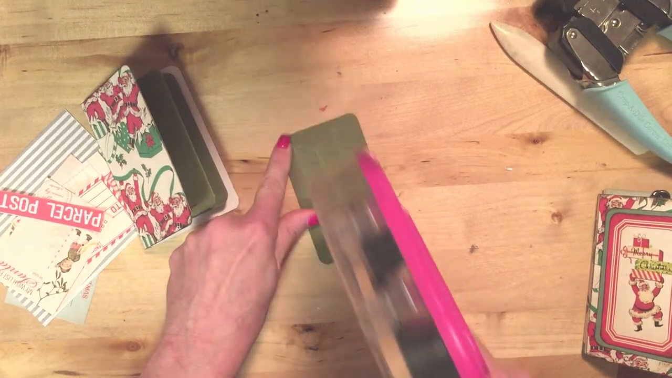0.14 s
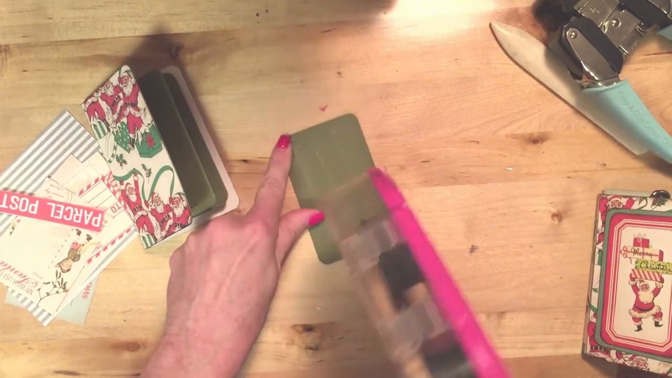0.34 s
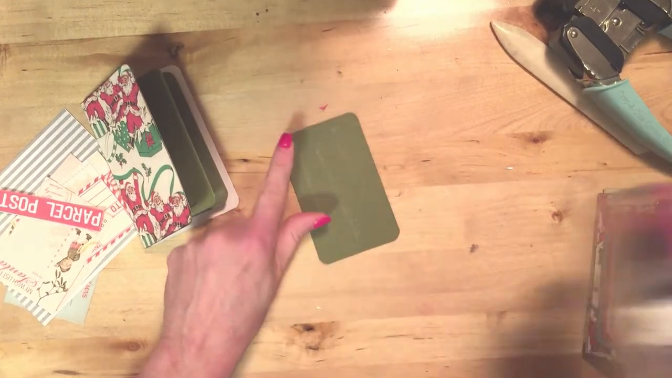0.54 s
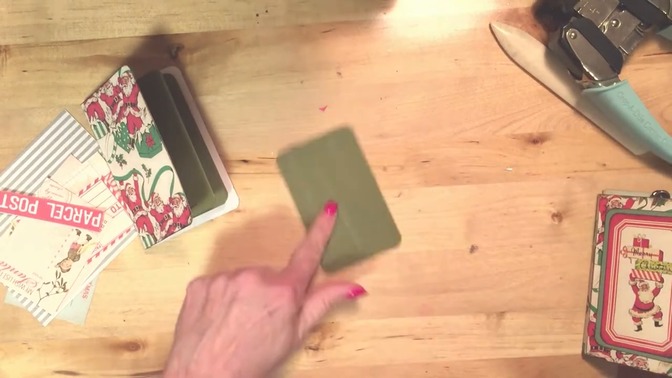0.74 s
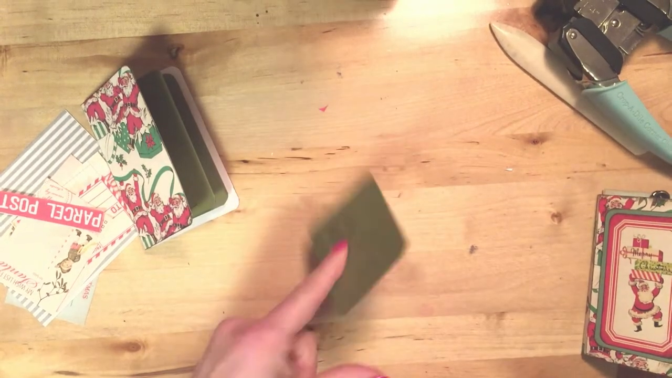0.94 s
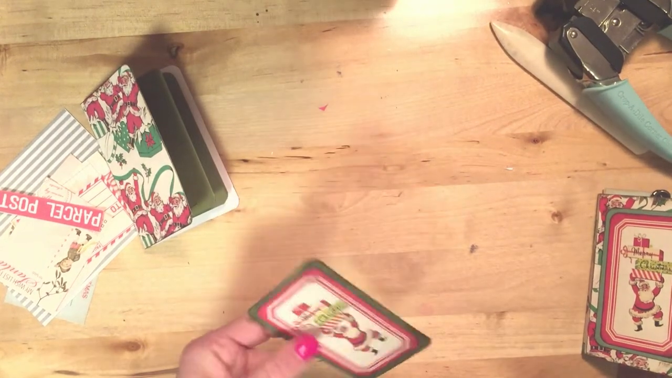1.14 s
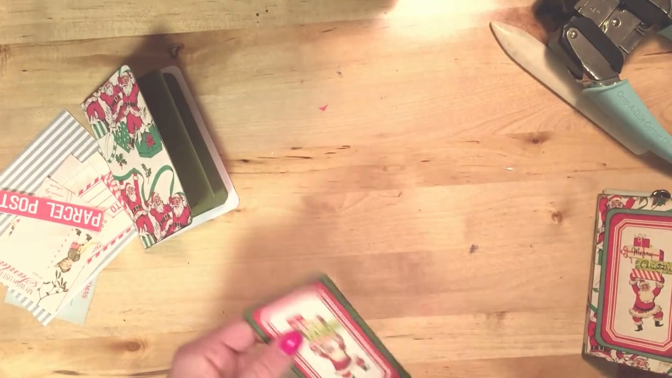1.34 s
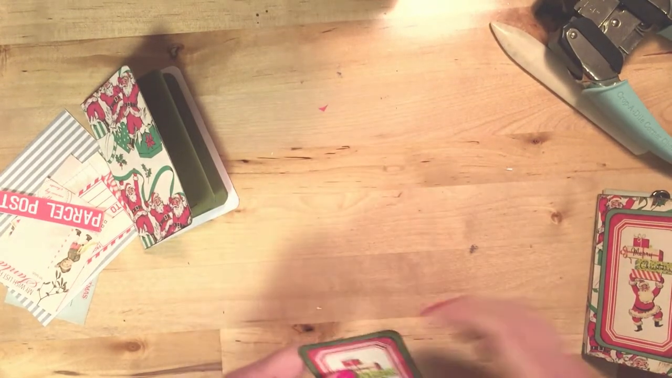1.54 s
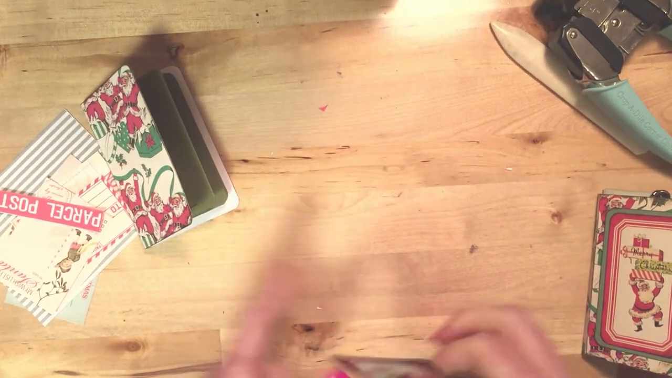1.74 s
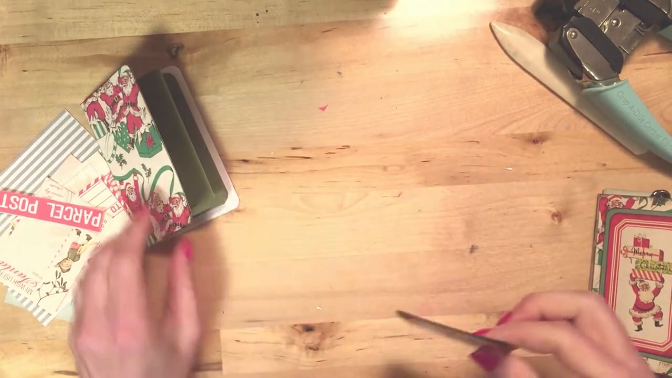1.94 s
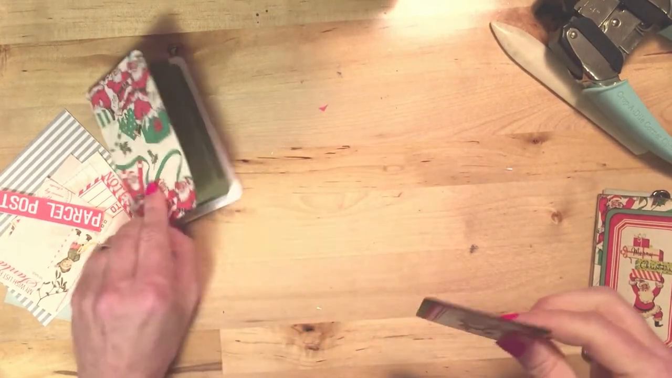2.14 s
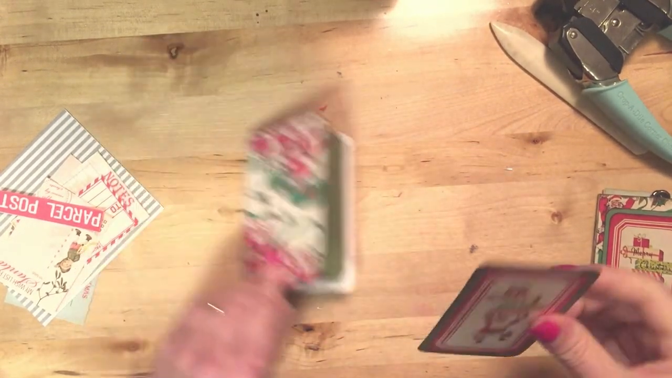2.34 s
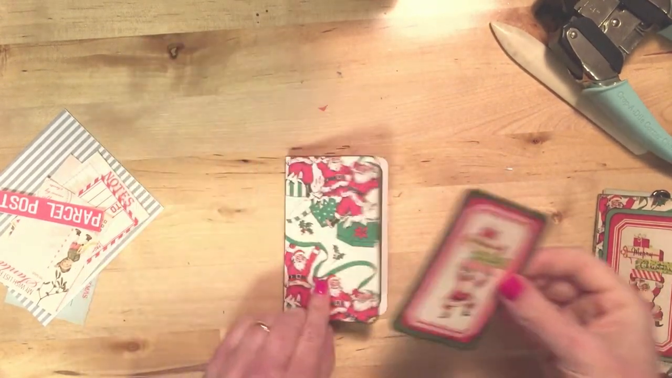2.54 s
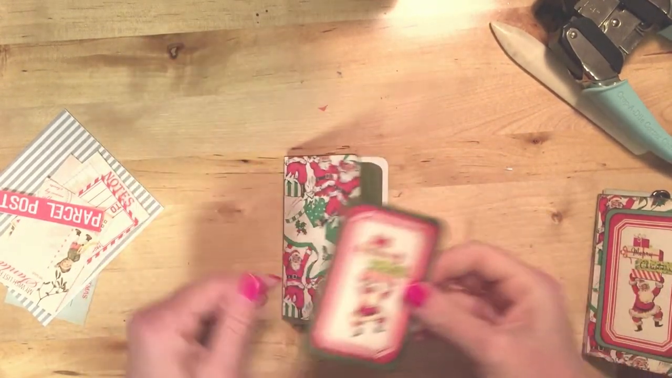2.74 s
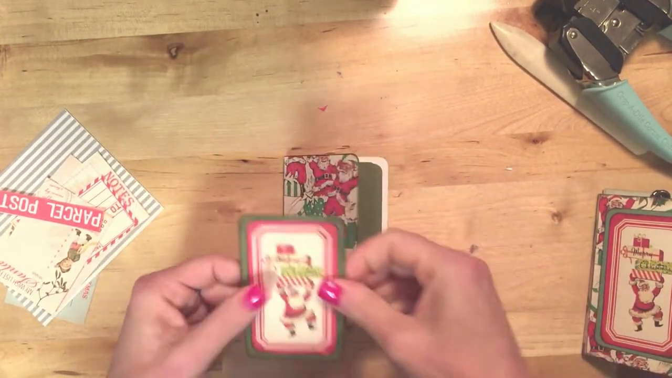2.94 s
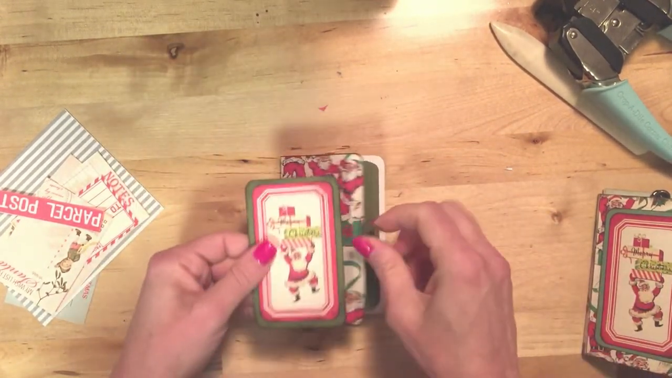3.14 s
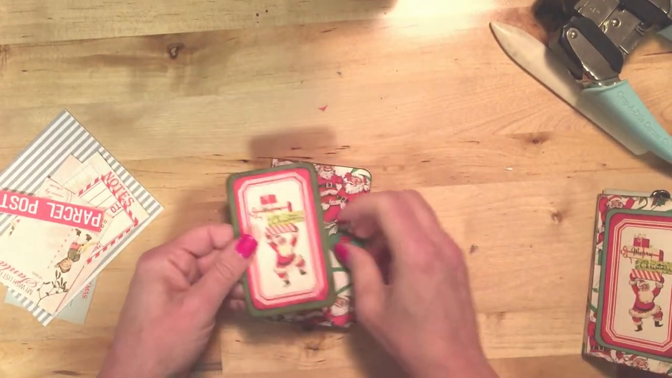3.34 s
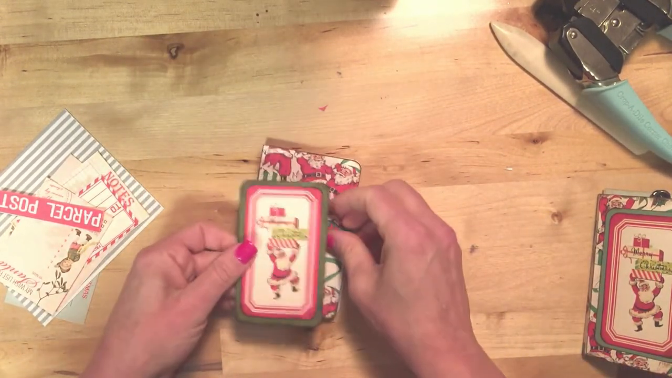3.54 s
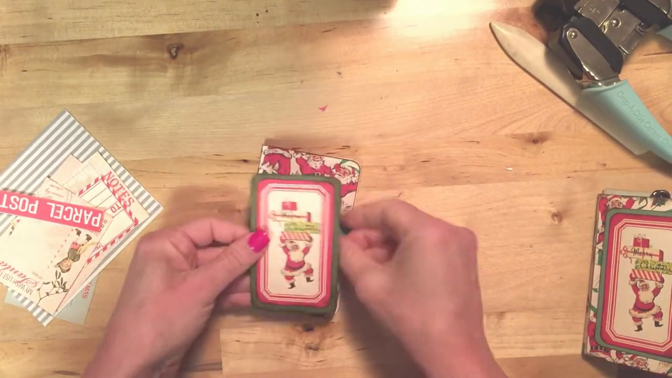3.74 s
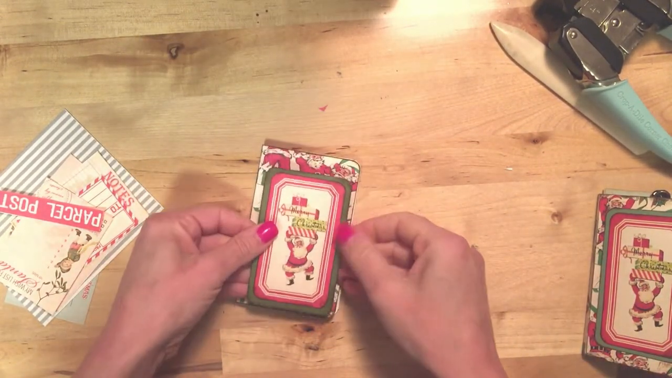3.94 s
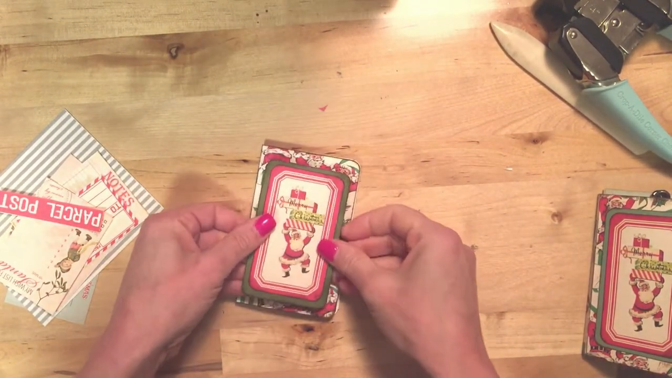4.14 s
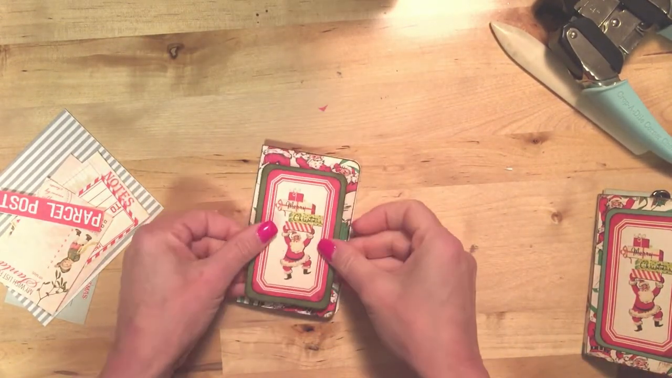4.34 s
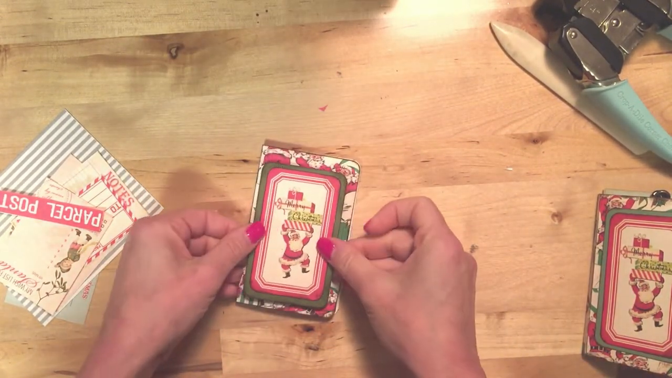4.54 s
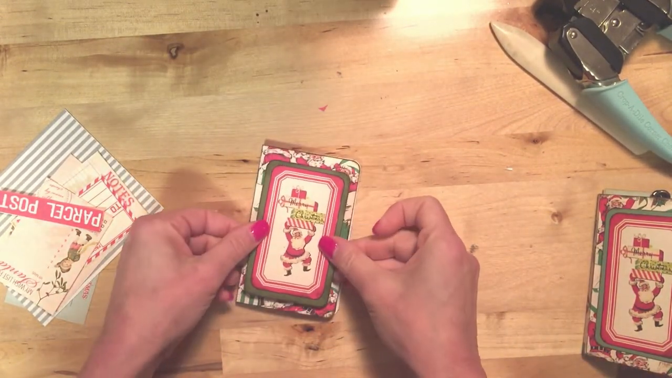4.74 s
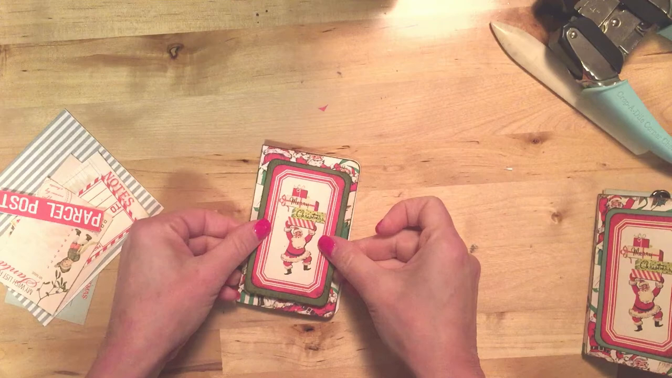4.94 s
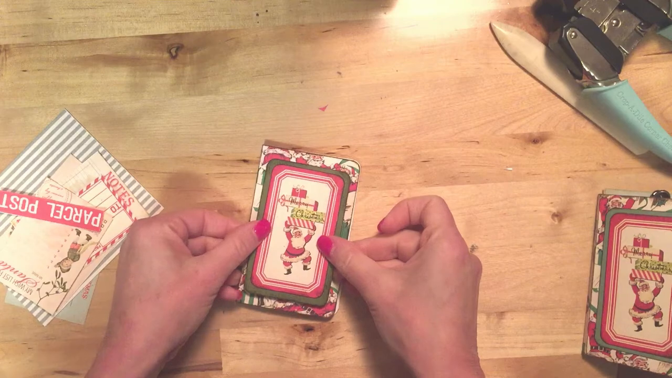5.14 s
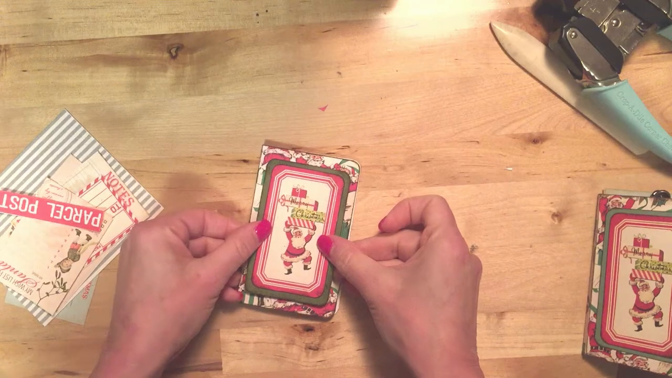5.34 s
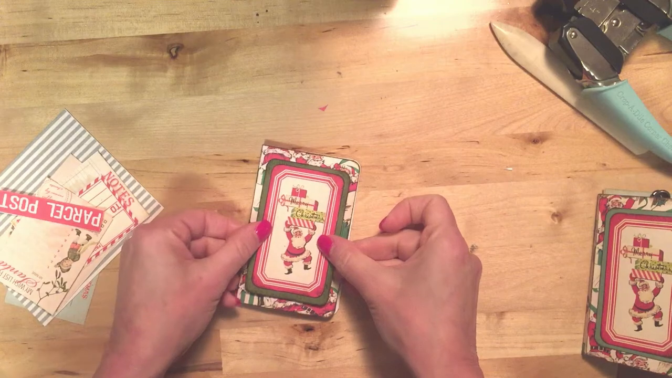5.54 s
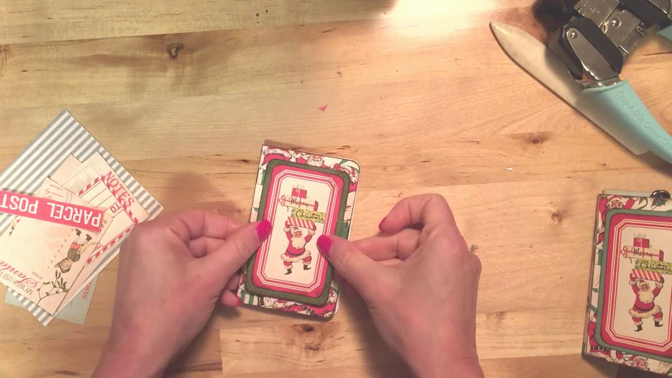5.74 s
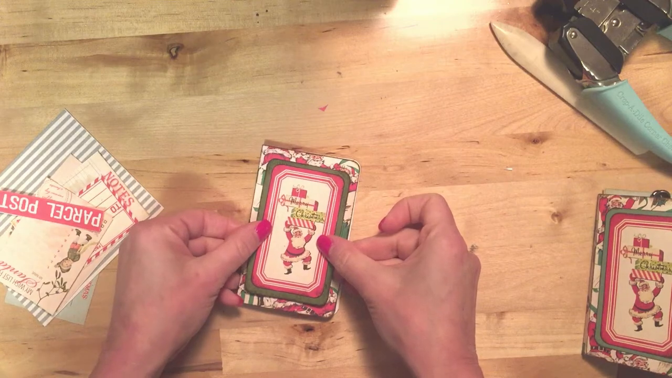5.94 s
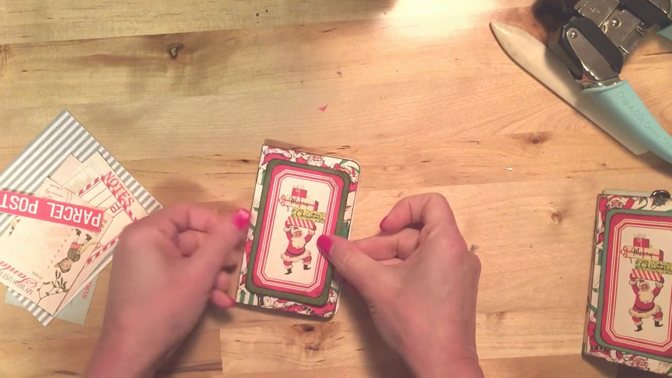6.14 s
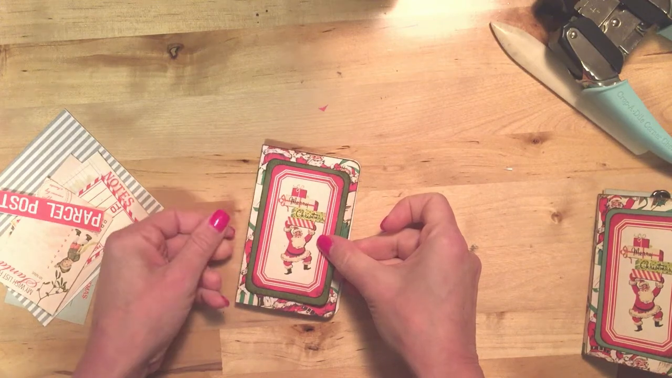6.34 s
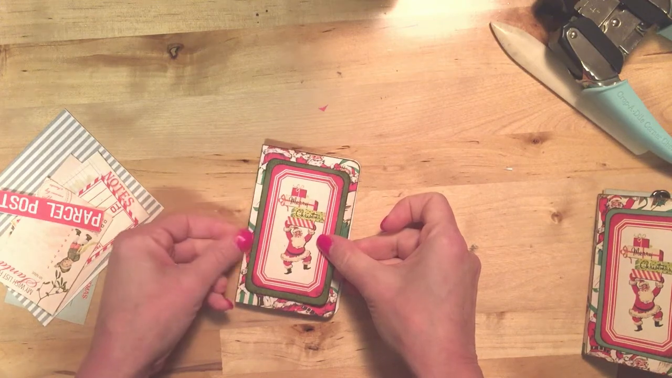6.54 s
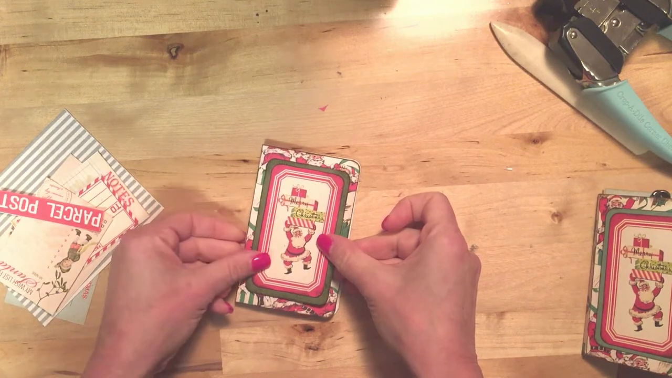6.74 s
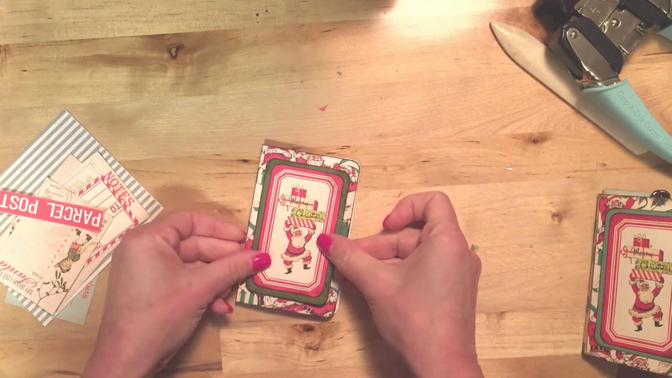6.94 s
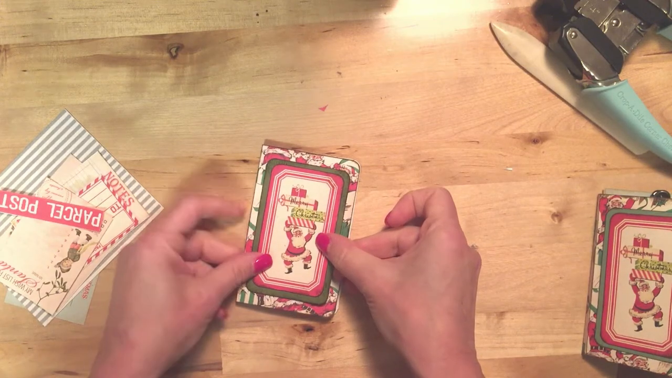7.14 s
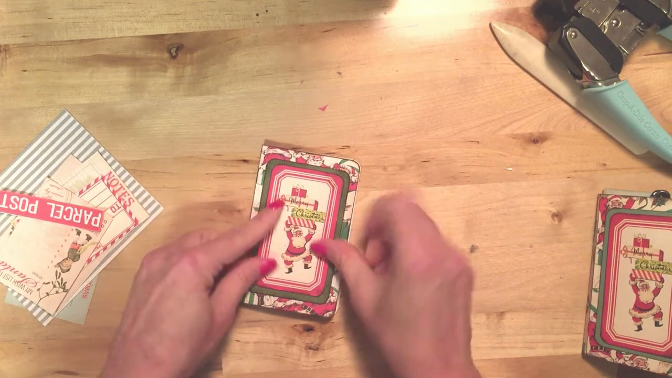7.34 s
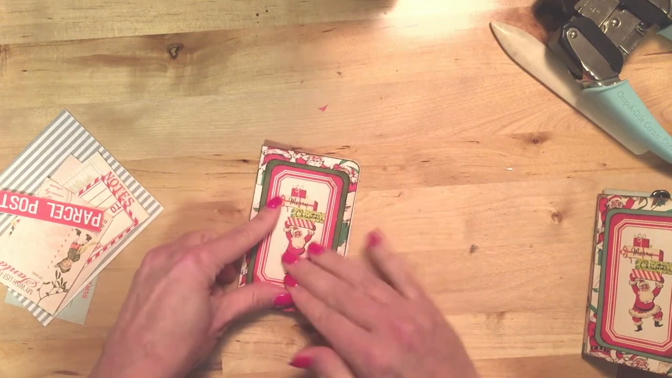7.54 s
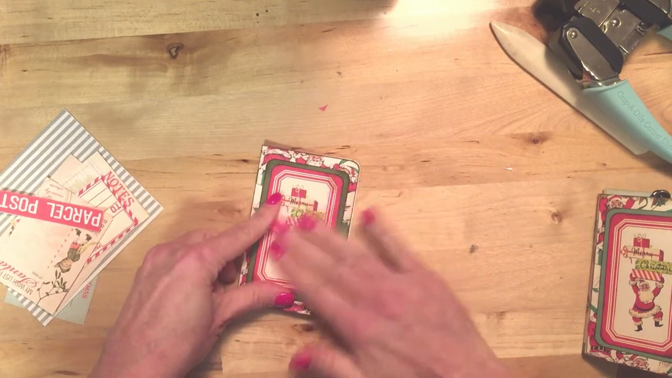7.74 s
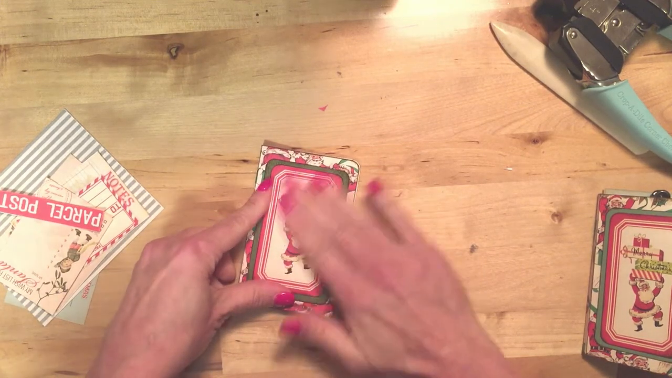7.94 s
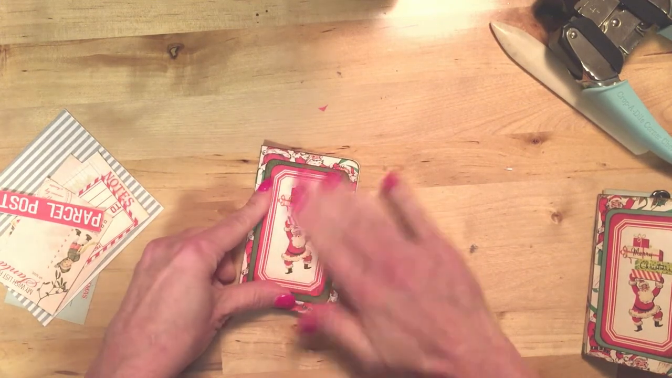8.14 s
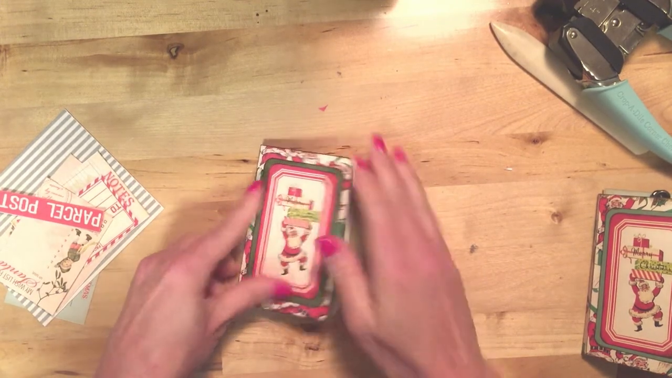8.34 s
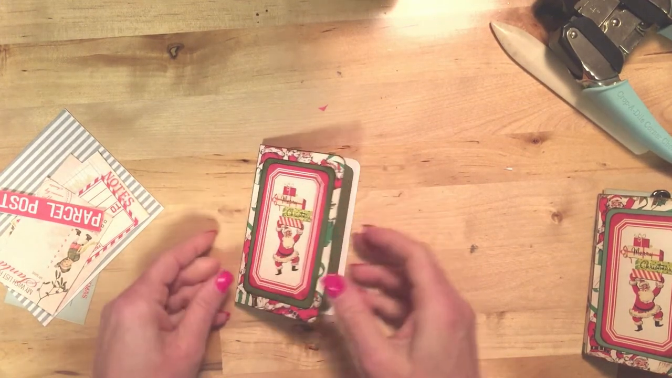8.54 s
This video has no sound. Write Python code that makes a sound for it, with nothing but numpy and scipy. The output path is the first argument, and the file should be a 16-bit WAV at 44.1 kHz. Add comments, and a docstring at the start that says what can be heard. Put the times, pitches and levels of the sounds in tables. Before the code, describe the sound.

Close up at a wooden table in a small room, a hollow plastic tape runner tears along card with a brief ratcheting buzz and snaps off. It is set down with a loud double clatter and a skid. Light card clicks and papery swishes follow, then a quiet stretch with small fingernail ticks, and finally several quick, bright strokes of dry fingers over card, above faint hiss and rumble.

```python
"""Tape runner and card on a table

A big plastic tape runner is dragged over a card, snapped off and set down with a clatter on a wooden table.
Paper slides and card edges click around it; later fingernails pick at the rim and fingers rub in quick strokes.
Friction is made of random tiny slips, blows of noise bursts through resonances, picks of damped sines.
It is heard close, mono on two channels, over rumble, hiss and a faint hum that drift in level.
"""
import sys
import numpy as np
from scipy import signal
from scipy.fft import rfft, irfft
from scipy.io import wavfile

SR = 44100
rng = np.random.default_rng(int(sys.argv[2]) if len(sys.argv) > 2 else 0)


def master_out(mix):
    """Clip the mix to full scale and print it as 16-bit PCM to the path in sys.argv[1]."""
    frames = np.transpose(np.atleast_2d(mix))
    ceiling = np.clip(frames, -1, 1)
    pcm = np.round(ceiling * 32767).astype(np.int16)
    wavfile.write(sys.argv[1], SR, pcm)


N = 378378
T = np.arange(N) / SR  # seconds


def amp(db):
    """Gain from dB."""
    return 10 ** (np.asarray(db) / 20)


def unit(x):
    """Scale to rms 1."""
    return x / np.sqrt(np.mean(x ** 2))


def curve(rows, axis=1):
    """Gain over time from a dB column of a table."""
    rows = np.array(rows)
    return amp(np.interp(T, rows[:, 0], rows[:, axis]))


def add(out, s, x):
    """Mix x into out at time s."""
    i = max(int(s * SR), 0)
    out[i:i + len(x)] += x[:max(N - i, 0)]


def through(x, response):
    """Convolve, keeping the length."""
    return signal.fftconvolve(x, response)[:len(x)]


def colour(x, points, ripple_db=0, size=4096):
    """Causal filter with a spectrum of (Hz, dB) points; ripple stands for an object's many small modes."""
    hz, db = np.transpose(points)
    f = np.maximum(np.fft.rfftfreq(size, 1 / SR), 1)
    mode = 45 * np.log1p(f / 2500)
    uneven = np.interp(mode, np.arange(128), rng.uniform(-1, 1, 128))
    level_db = np.interp(np.log(f), np.log(hz), db) + ripple_db * uneven
    # folding the cepstrum gives minimum phase, so nothing sounds ahead of the blow
    cepstrum = irfft(np.log(amp(level_db)))
    cepstrum[1:size // 2] *= 2
    cepstrum[size // 2 + 1:] = 0
    return through(x, irfft(np.exp(rfft(cepstrum))))


def ring(hz, t60, size=22050):
    """One damped mode; t60 in seconds."""
    t = T[:size]
    return np.sin(2 * np.pi * hz * t) * np.exp(-np.log(1000) * t / t60)


def resonances(modes, damping=1):
    """Response of (Hz, width Hz, dB) modes; damping widens each, its own peak stays near its dB."""
    t = T[:SR // 2]
    response = 0
    for hz, width, db in modes:
        damped_width = width * damping
        decay = np.exp(-np.pi * damped_width * t)
        response = response + amp(db) * 2 * np.pi * damped_width / SR * np.cos(2 * np.pi * hz * t) * decay
    return response


def wander(rate):
    """Smooth chance with a spread near 1, heading for a new value rate times a second."""
    steps = rng.standard_normal(8192)
    return np.interp(T * rate, np.arange(len(steps)), steps)


def slips(rate, spread_db):
    """Stick-slip friction: tiny clicks of uneven size at random times, rate per second."""
    happens = rng.random(N) < rate / SR
    sizes = rng.standard_normal(N)
    sizes[happens] *= amp(spread_db * np.minimum(rng.exponential(size=N)[happens], 4))
    return unit(happens * sizes)


def contact(rattle_ms, size=4096, count=4):
    """A blow of unit energy: chatter that dies away, spread about evenly over all pitches."""
    t = T[:size] * 1000 / max(rattle_ms, .1)
    x = rng.standard_normal(size) * np.exp(-t)
    for _ in range(count):
        flat = irfft(np.exp(1j * np.angle(rfft(x))))
        x = flat * np.exp(-(t / 3) ** 2)
    return x / np.sqrt(np.sum(x ** 2))


def blows(rows, bass_db, top_db, q, ripple_db):
    """Each blow has its own hardness and rattle, and the struck spot rings at its own pitch."""
    out = np.zeros(N)
    for s, db, body_db, edge_db, air_db, rattle_ms, ring_hz, ring_db in rows:
        # light objects radiate little bass
        shape = [(40, body_db + bass_db - 17), (130, body_db + bass_db), (340, body_db), (700, body_db),
                 (1100, 0.01), (1800, 0.013), (3400, edge_db), (8500, air_db), (16000, air_db + top_db)]
        blow = colour(contact(rattle_ms), shape, ripple_db)
        spot = through(blow, resonances([(ring_hz, ring_hz / q, ring_db)]))
        add(out, s, amp(db) * (blow + spot))
    return out


# background level before trim: (time [s], rumble level [dB], hiss level [dB])
AMBIENCE = [(0, -58.5, -52.5), (1.5, -69.5, -63.5), (2.7, -68.5, -60.5), (3.4, -66.5, -54.5),
            (4.8, -63.5, -56.5), (5.2, -59, -57), (8.58, -59.5, -55)]
# spectrum of the low rumble: (frequency [Hz], relative level [dB])
RUMBLE_COLOUR = [(20, -21.5), (45, -10), (68, 3.5), (90, -3.5), (125, 4), (170, -2.5), (250, -1.5),
                 (400, -14), (700, -23), (2000, -47.5)]
# spectrum of the room hiss: (frequency [Hz], relative level [dB])
HISS_COLOUR = [(25, -13.5), (100, 3.5), (300, -4), (480, -2.5), (630, -2.5), (800, -3), (1600, -3.5),
               (2500, -5.5), (5000, -9.5), (10000, -14.5), (16000, -19)]
# hum tones: (frequency [Hz], middle rms level [dB])
HUM = [(70, -75), (124, -77.5), (630, -76)]


def room_noise():
    """Unsteady low rumble and hiss are filtered noise; the faint hum is sines that waver in level and phase."""
    rumble = unit(colour(rng.standard_normal(N), RUMBLE_COLOUR)) * curve(AMBIENCE)
    rumble = rumble * amp(0.72 * wander(28) + 1.0)
    hiss = unit(colour(rng.standard_normal(N), HISS_COLOUR)) * curve(AMBIENCE, axis=2) * amp(-6.5)
    hum = np.zeros(N)
    for hz, db in HUM:
        level = amp(db + 1.1 * wander(9.9)) * np.sqrt(2)
        hum += level * np.sin(2 * np.pi * hz * T + .8 * wander(23))
    return rumble + hiss + hum


# paper sliding on paper and wood, levels before the rasp and hiss trims:
# (middle [s], time from middle to 1/e [s], level [dB], air against level [dB])
SLIDES = [(.826, 0.013, -64.5, 25.5), (1.135, .037, -51, -5), (1.253, 0.073, -40.5, -12),
          (1.769, .02, -46, -12), (2.17, 0.021, -52.5, -14), (2.287, 0.035, -52.5, 9.5),
          (2.409, 0.026, -47.5, 10.5), (2.512, 0.017, -57, -5), (2.573, 0.024, -54, -11.5),
          (3.181, 0.03, -50, -11), (3.258, 0.032, -56, 2), (3.379, 0.023, -58, -6),
          (3.429, 0.015, -47, -13), (3.778, 0.021, -43.5, -20.5), (3.838, 0.03, -60.5, 17.5),
          (3.88, 0.014, -50.5, -9), (4.379, 0.043, -57, 4.5), (6.134, 0.023, -49.5, 9),
          (7.297, 0.032, -46, 4.5)]
# spectrum of the paper's rasp: (frequency [Hz], relative level [dB])
RASP_COLOUR = [(200, -22), (900, -14), (1600, 4), (3200, -1), (5000, -4), (9000, -8), (16000, -21.5)]


def paper_slides():
    """Short grainy swishes: coarse fibre slips rasp, finer ones hiss, coloured afresh for each patch of paper."""
    fibres = unit(slips(rate=1800, spread_db=2) * amp(2.5 * wander(150)))
    nap = slips(rate=6000, spread_db=3)
    nap_colour = [(1500, -22.0), (4000, -7), (7500, 1.5), (16000, -5)]
    out = np.zeros(N)
    for s, spread_s, db, air_db in SLIDES:
        near = np.abs(T - s) < .3
        rasp = unit(colour(fibres[near], RASP_COLOUR, ripple_db=11.0))
        hiss = unit(colour(nap[near], nap_colour, ripple_db=4.0))
        swell = np.exp(-((T[near] - s) / spread_s) ** 2)
        out[near] += amp(db) * swell * (amp(-2) * rasp + amp(air_db - 13.5) * hiss)
    return out


# clicks and taps of the card: (time [s], level near 1.4 kHz [dB], then relative to that: body [dB],
# edge [dB], air [dB]; rattle [ms], ring pitch [Hz], ring against blow [dB])
CLICKS = [(0.7728, -5, -0.5, -4, -3.5, 1.5, 4010, 10.6), (1.697, -20, 9, 4.5, -1.5, 0.89, 2550, 8.5),
          (1.77, -3.5, -2.5, 2, -9.5, 4.5, 720, 4.9), (2.1112, -13, -4, -6, -9, 3.56, 1790, 5.5),
          (2.1645, -19, -9, -13, -15, 3.4, 1800, 5), (2.1765, -16, -7, -17, -14, 2.7, 1800, 2.8),
          (2.3053, -15.5, 1.5, 9, 11.5, 0.81, 1907, 13), (2.392, -25, -27.5, 3, -21, 2.8, 3250, 4.5),
          (2.5383, -17, -4.5, -9, -18, 9.1, 1905, 4.2), (2.559, -19, -19, -1, -15, 4.5, 1645, 8.1),
          (2.8955, -24, -1, 7.5, -13, 1.4, 3340, 3.7), (3.0255, -23, 1.5, -13, 10.5, 1.95, 1010, 19.3),
          (3.0315, -23, 7, 0, -31, 2, 940, 11), (3.0475, -29, 3, -10, 5, 1.8, 1000, 4),
          (3.166, -9, 0, -3, -12.5, 2.5, 1514, 3.5), (3.2013, -17, -2.5, -2, -22, 2, 1380, 6),
          (3.231, -16, -8, -7, -15, 2.7, 1410, 6.2), (3.4343, -10, -20, -4.5, -16, 2.2, 2290, 3),
          (3.7812, 7, -14, -1, -21, 1.36, 3045, 1.6), (3.796, 4, -12, -11, -14.5, 0.6, 1700, 2),
          (4.069, -15.5, -6.5, -12, -35, 4.3, 813, 14.7), (6.136, -14, 5, -8, -18, 2.7, 1346, 9.9),
          (7.3002, -2, -15, -13, -10, 0.59, 9100, 11.4), (7.302, 1.5, 1.5, -2, -22, 1.47, 960, 1.3),
          (7.5552, -4, -2.5, 1, -5.5, 0.62, 1290, 9), (7.5772, -16.5, 2, -6, -3, 3.8, 3080, 3.6),
          (7.936, -4.5, -6, -0.5, -7, 0.34, 4180, 6.3), (8.4675, -16.5, 0, -4, -9.5, 2.2, 1265, 14)]


def card_clicks():
    """Card edges flick and tap; paper damps the ring within a few cycles, hence the low q."""
    return blows(CLICKS, bass_db=-6, top_db=-12, q=5, ripple_db=5.5)


# a fingernail slips off the card's rim: (time [s], dry peak level [dB])
PICKS = [(4.585, -50), (4.6434, -44.5), (4.8291, -46.5), (5.031, -41), (5.089, -26), (5.1213, -25),
         (5.66, -32.5), (5.78, -33), (5.882, -47), (6.0543, -23), (6.1091, -28.5)]


def nail_picks(hz=1530, t60=0.006, snap_hz=2350, snap_t60=0.0025, snap_db=-1, rise_s=0.00067):
    """The stiff card rim springs back from a nail and swings for a few cycles, a little differently each time."""
    out = np.zeros(N)
    chance = rng.uniform([.92, -4], [1.08, 3], (len(PICKS), 2))
    for (s, db), (detune, hardness_db) in zip(PICKS, chance):
        swing = ring(hz * detune, t60)
        snap = amp(snap_db + hardness_db) * ring(snap_hz * detune, snap_t60)
        onset = 1 - np.exp(-T[:len(swing)] / rise_s)
        flick = (swing + snap) * onset
        add(out, s, amp(db) * flick / np.abs(flick).max())
    return out


# a stroke's speed is an arch that peaks early; the hiss levels off at speed, the card's own sound follows it
RUB_SKEW, RUB_FLATTEN, HISS_POWER, CARD_POWER = 0.81, 1.31, 2.23, 1
# strokes over the card: (start [s], length [s], hiss level before trim [dB], card level before wander [dB])
RUBS = [(7.374, 0.079, -56, -53.5), (7.419, .15, -41.5, -54.5), (7.635, .133, -34.5, -57),
        (7.756, 0.11, -35, -52.5), (7.864, 0.14, -34.5, -53), (7.999, 0.15, -35, -59),
        (8.144, 0.2, -32.5, -58.5), (8.323, 0.14, -49, -73)]
# spectrum of skin hissing on card: (frequency [Hz], relative level [dB])
SKIN_COLOUR = [(150, -31), (500, -38), (1500, -22), (2400, -5), (3300, 2.5), (5500, 2), (9000, 5.5),
               (13000, 4), (16000, 1.5)]
# the card's modes under the fingers: (frequency [Hz], width before damping [Hz], relative level [dB])
CARD_MODES = [(1120, 56, -16), (1380, 280, 14), (1600, 62, 19), (2240, 190, 3)]


def finger_rubs():
    """Dry skin on card: bright slip noise follows the hand's speed, and slower slips excite the card's modes."""
    hiss_gain, card_gain = np.zeros(N), np.zeros(N)
    for s, length_s, hiss_db, card_db in RUBS:
        progress = np.linspace(0, 1, int(length_s * SR))
        speed = np.abs(np.sin(np.pi * progress ** RUB_SKEW))
        add(hiss_gain, s, amp(hiss_db) * np.tanh(RUB_FLATTEN * speed) ** HISS_POWER)
        add(card_gain, s, amp(card_db) * speed ** CARD_POWER)
    # two fingertips, each with its own colour; the weight shifts between them
    shift = amp(3 * wander(16))
    first = colour(slips(rate=14000, spread_db=0.0), SKIN_COLOUR, ripple_db=5.5)
    second = colour(slips(rate=14000, spread_db=0.0), SKIN_COLOUR, ripple_db=5.5)
    grain = unit(first * shift + second / shift) * amp(.8 * wander(120))
    body = unit(through(slips(rate=1400, spread_db=2.0), resonances(CARD_MODES, damping=1.6)))
    body = body * amp(3 * wander(30))
    return amp(0.5) * grain * hiss_gain + body * card_gain


# blows that reach the table top: (time [s], boom level [dB])
THUMPS = [(0.408, -38.5), (0.775, -36.5), (1.093, -30), (1.226, -20.5), (3.166, -52), (3.779, -56),
          (7.302, -46)]
# the table top's low boom: (frequency [Hz], t60 [s], relative level [dB])
BOOM_MODES = [(204, 0.19, -2.5), (227.5, 0.069, -7.5), (170, 0.24, -17), (202, 1, -33)]


def table():
    """The wooden top answers some of the blows with a sum of low damped modes."""
    out = np.zeros(N)
    boom = sum(amp(db) * ring(hz, t60) for hz, t60, db in BOOM_MODES)
    for s, db in THUMPS:
        add(out, s, amp(db) * boom)
    return out


# the skid grows from landing to tipping, then falls away fast
LAND_S, TIP_S, SKID_DB = 1.1, 1.222, -26
SKID_RISE_DB_PER_S, SKID_FALL_DB_PER_S = 67, 242.5
# spectrum of the skid: (frequency [Hz], relative level [dB])
SKID_COLOUR = [(60, -16), (180, 0.5), (350, -14.5), (650, -1), (950, 2), (1400, -8), (2500, -10.5),
               (5000, -25), (16000, -37)]


def runner_skid():
    """The case judders across the table top in coloured stick-slip, ever harder, then shudders to rest."""
    judder = slips(rate=2100, spread_db=3.0) * amp(1.9 * wander(100))
    before_tip = SKID_RISE_DB_PER_S * (TIP_S - T)
    after_tip = SKID_FALL_DB_PER_S * (T - TIP_S)
    db = SKID_DB - np.maximum(before_tip, after_tip)
    return unit(colour(judder, SKID_COLOUR, ripple_db=5.5)) * amp(db) * (T > LAND_S)


TEETH_HZ, TEETH_SAG_DB = 58.44, -7.5  # mean tooth rate of the gear; sag of the pull between teeth
SNAP_DECAY_S, CRACKLE_DB = .006, -18  # the fine crackle is relative to the stroke curve
# the runner's stroke, before the layer trims: (time [s], level [dB])
STROKE = [(0, -38), (.06, -30.5), (.12, -29.5), (.19, -24.5), (.225, -29), (.268, -38), (.295, -57)]
# tape tearing off the roll: (frequency [Hz], relative level [dB])
PEEL_COLOUR = [(60, -37.5), (140, -37), (250, -7.5), (365, 12), (450, 5), (580, -5), (800, -8.5), (1200, 1),
               (2200, -12.5), (2450, -8.5), (4200, -23), (7500, -34.5), (16000, -36)]
# threads of glue that snap during the stroke: (time [s], level [dB])
GLUE_SNAPS = [(0.023, -33.5), (0.034, -36.5), (.112, -30), (.126, -39.5), (.186, -36.5), (0.251, -38.5)]
# the runner's hollow case, also heard in its knocks:
# (frequency [Hz], width before damping [Hz], relative level [dB])
CASE_MODES = [(330.3, 53, -3), (579.7, 63, -1.5), (1125, 43, -8.5), (1373, 27, -5), (1820, 150, -12),
              (2124, 65, -12), (3100, 73, -13.5), (3210, 26, -14.5), (3530, 140, -13), (4030, 300, -23.5),
              (4600, 40, -25.5), (6400, 110, -17.5)]


def runner_stroke():
    """Tape tears off in dense slips, pulsed by the gear teeth, and shakes the case."""
    teeth = np.cumsum(TEETH_HZ * (1 + 0.029 * wander(25))) / SR % 1
    drive = unit(slips(rate=7000, spread_db=-1.5) * amp(TEETH_SAG_DB * teeth))
    # the pressure wanders among three points of contact, each with its own colour
    weights = np.array([amp(7 * wander(22)) for _ in range(3)])
    weights = weights / np.sqrt(np.sum(weights ** 2, axis=0))
    tearing = sum(weight * unit(colour(drive, PEEL_COLOUR, ripple_db=13)) for weight in weights)
    hollow_colour = [(60, -33), (140, -7), (300, 2.0), (3500, 1.0), (16000, -11.0)]
    hollow = unit(colour(through(drive, resonances(CASE_MODES, damping=0.6)), hollow_colour))
    # glue crackles in step with the stroke, and in a little cluster where a thread snaps
    glue_colour = [(1000, -20), (3500, 0), (8000, -3), (16000, -8)]
    glue = unit(colour(slips(rate=1800, spread_db=1), glue_colour, ripple_db=10))
    crackle = amp(CRACKLE_DB + 2.5 * wander(60)) * curve(STROKE)
    for s, db in GLUE_SNAPS:
        add(crackle, s, amp(db) * np.exp(-T[:SR // 2] / SNAP_DECAY_S))
    rolling = (amp(-3) * tearing + amp(-5.5) * hollow) * curve(STROKE)
    fade_out = np.interp(T, [.29, .34], [1, 0])
    return (rolling + glue * crackle) * fade_out


# knocks of the runner, before the layer trims: (time [s], level near 1.4 kHz [dB],
# then relative to that: body [dB], edge [dB], air [dB]; rattle [ms], ring pitch [Hz])
KNOCKS = [(0.3404, 0.5, 0, -17.5, -36.5, 6, 1130), (0.3582, 5, 5, -6, -23, 12, 1130),
          (0.3904, 8, -8, 7.5, -14.5, 15, 3560), (0.4082, 19.5, 4, 1.5, -10, 7.5, 1103),
          (0.553, -16, 8, -9, -12, 8, 1130), (0.574, -14.5, 0, -19, -31, 3.8, 350),
          (1.0925, 19.5, 5.5, -4.5, -9.5, 7.8, 1050), (1.1601, 8, 3, 0.5, -15.5, 6.5, 2660),
          (1.186, 11.5, 2.5, -14, -29.5, 7, 842), (1.2, 16.5, -4, -16.5, -41, 18, 1130),
          (1.2255, 23.5, 4, -5, -13.5, 5, 1940), (1.2305, 23.5, -5.5, -8, -17.5, 8, 2000),
          (1.3212, -5, -14, -0.5, -15, 4, 1560), (1.425, -19.5, 7, -38, -40, 45, 1073)]
# the table top's higher modes, reached only by the hard runner:
# (frequency [Hz], width [Hz], relative level [dB])
WOOD_MODES = [(367, 38, -4.5), (457, 90, -3), (624, 53, -1.5), (740, 57, -2.5), (889.5, 16, 4),
              (1087, 53, 1), (1313, 35, 1), (1690, 58, -7.5), (1865, 20, -1), (2410, 28, -5),
              (2820, 24, -1), (2830, 23, -3.5), (3480, 41, -4), (3807, 160, -4.5)]


def runner_knocks():
    """The runner snaps off the tape, lands and tips onto its side; each blow rings the case and the wood."""
    ring_db = 1.5  # how far the struck spot rings above the blow
    rows = [(*knock, ring_db) for knock in KNOCKS]
    hits = blows(rows, bass_db=-20.5, top_db=-7.0, q=14, ripple_db=6.5)
    case = through(hits, resonances(CASE_MODES, damping=.6))
    wood = through(hits, resonances(WOOD_MODES))
    return amp(-3.0) * hits + amp(-9.0) * case + amp(-3) * wood


def room(x, tail_db, t60=0.23, echo_s=.0086, echo_db=-19, size=26000):
    """A near wall gives one early echo, within a short noise tail that is duller than the direct sound."""
    t = T[:size]
    tail = rng.standard_normal(size) * np.exp(-np.log(1000) * t / t60) * np.clip(t / 0.0013, 0, 1)
    tail_colour = [(100, 3), (500, 0.5), (2000, -2.0), (5000, -3.5), (15000, -4.5)]
    tail = colour(tail / np.sqrt(np.sum(tail ** 2)), tail_colour)
    response = amp(tail_db) * tail
    response[int(echo_s * SR)] += amp(echo_db)
    return x + through(x, response)


def scene():
    """Everything happens on the table, in mono; the room rings longer after the runner than after the card."""
    runner = runner_stroke() + runner_knocks() + runner_skid() + table()
    card = card_clicks() + paper_slides() + finger_rubs()
    wet_runner = room(runner, tail_db=-8.5, t60=0.24)
    wet_card = room(card, tail_db=-6, t60=0.13)
    wet_picks = room(nail_picks(), tail_db=-9, t60=0.11, echo_db=-20)
    mono = wet_runner + wet_card + wet_picks + room_noise()
    return np.array([mono, mono])


def record(dry):
    """The recorder rounds the loudest peaks by soft saturation and cuts the top above 15.9 kHz."""
    ceiling = .75
    top = signal.ellip(10, .2, 80, 15900, fs=SR, output="sos")
    return signal.sosfilt(top, ceiling * np.tanh(dry / ceiling))


dry = scene()
out = record(dry)
master_out(out)
```